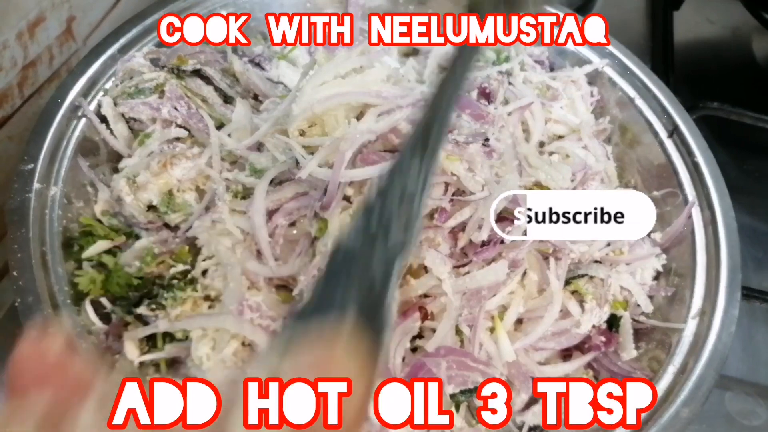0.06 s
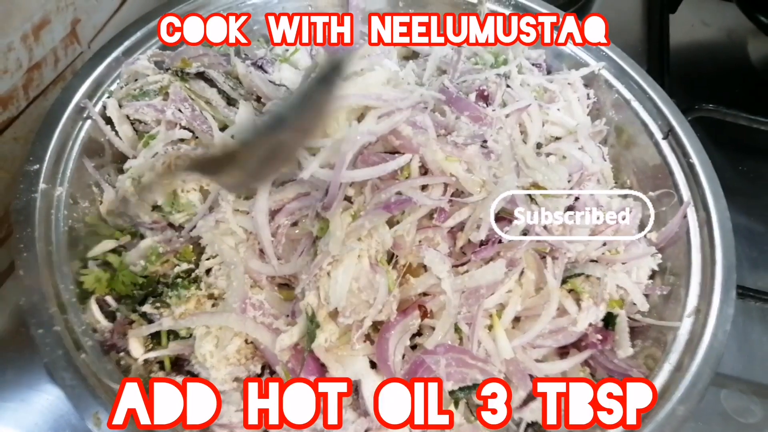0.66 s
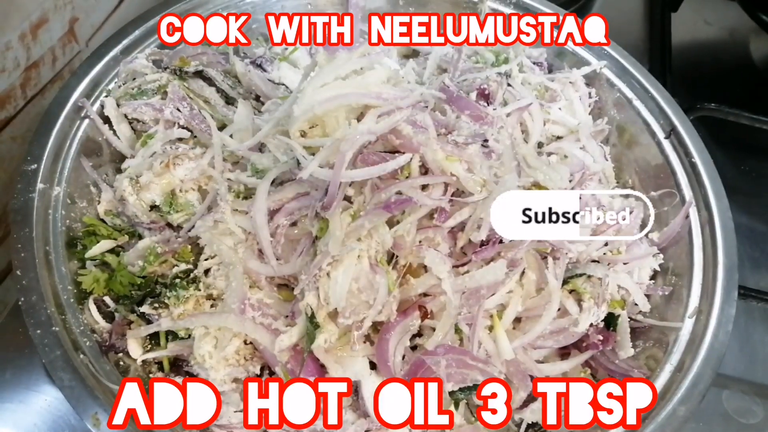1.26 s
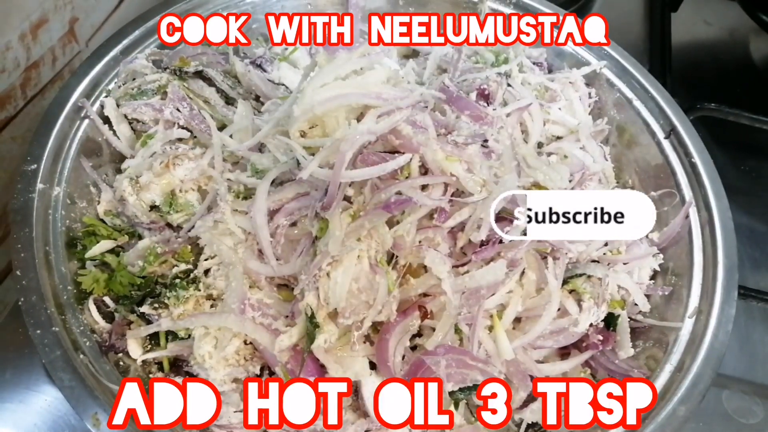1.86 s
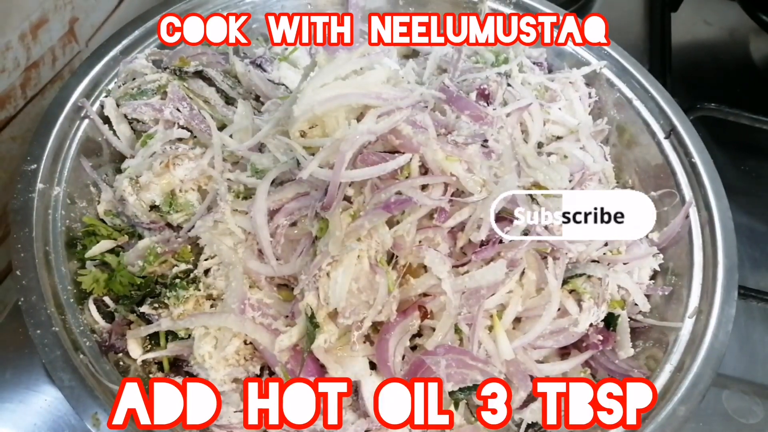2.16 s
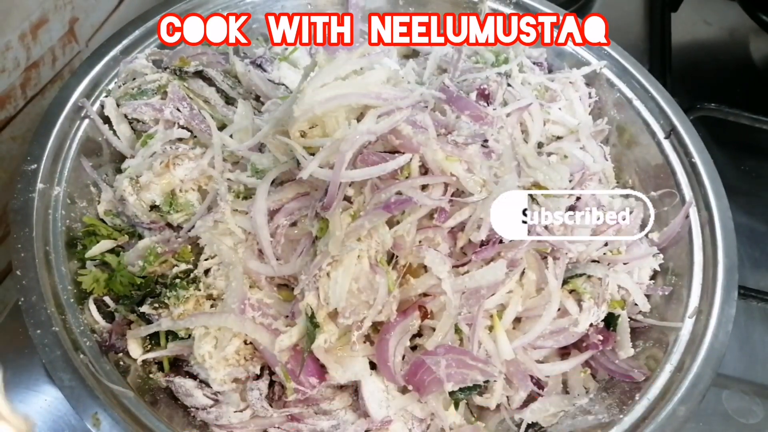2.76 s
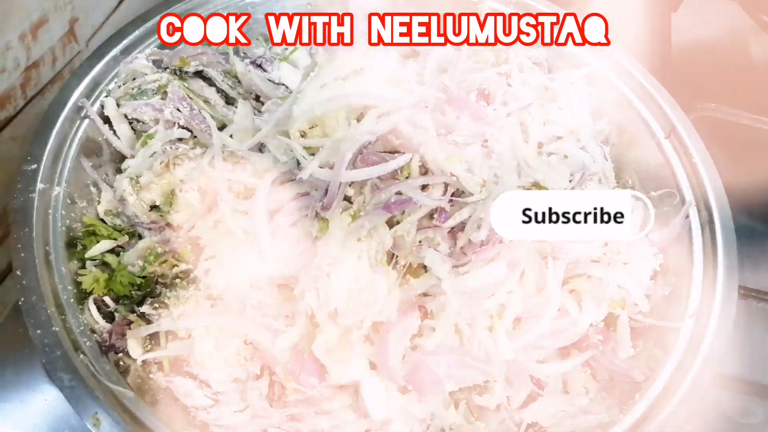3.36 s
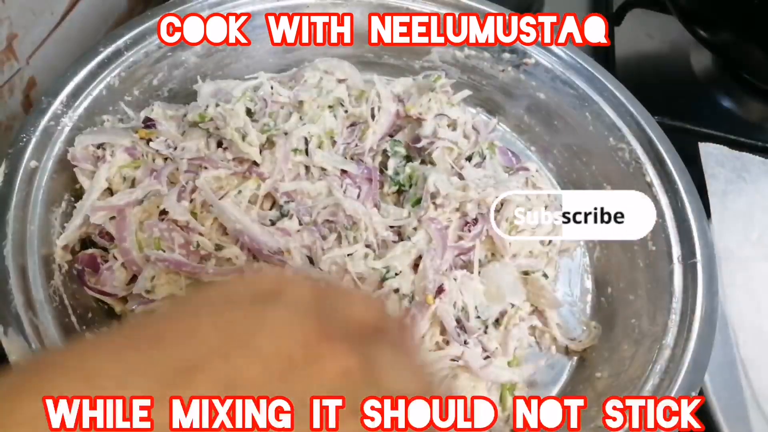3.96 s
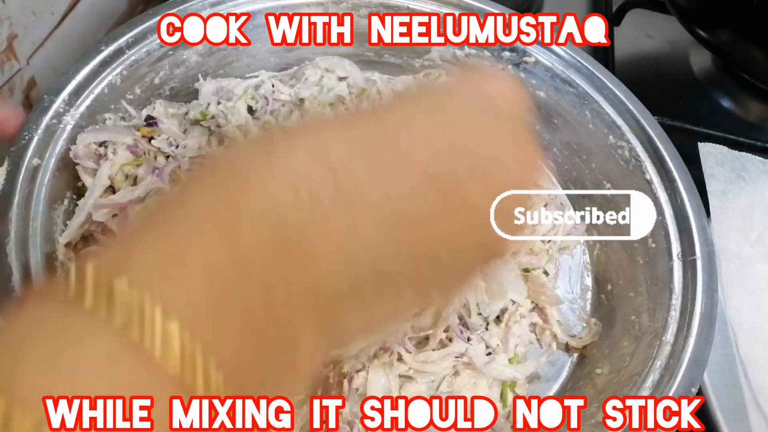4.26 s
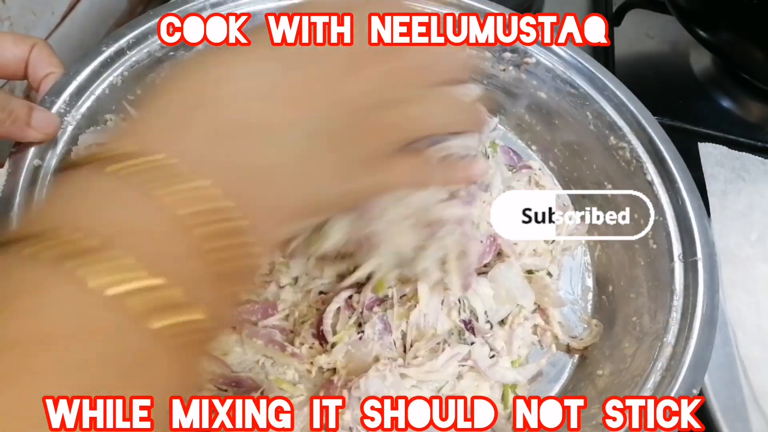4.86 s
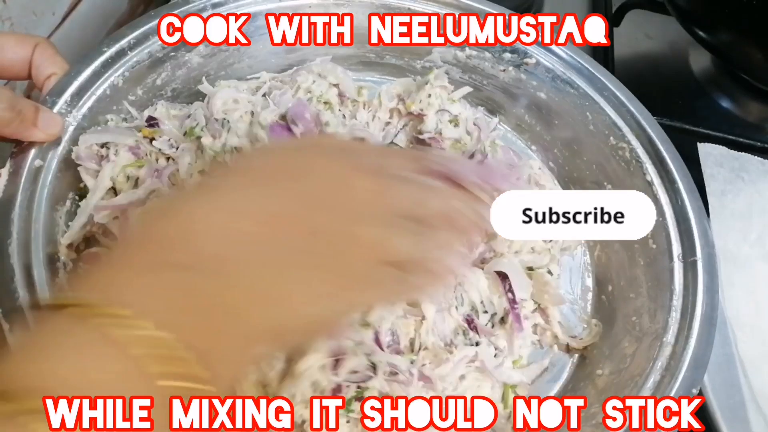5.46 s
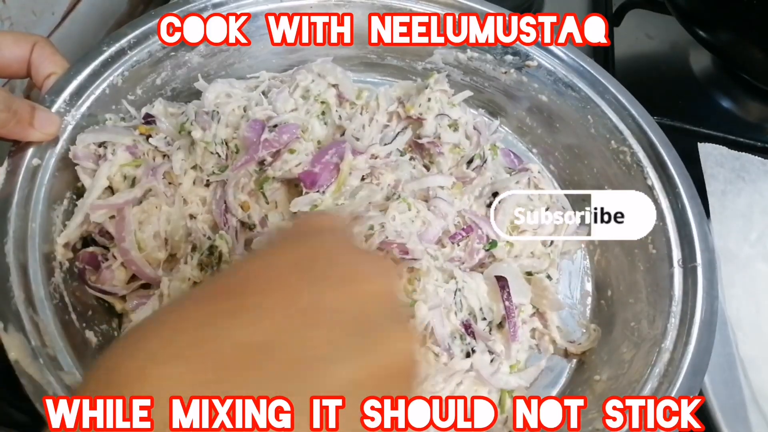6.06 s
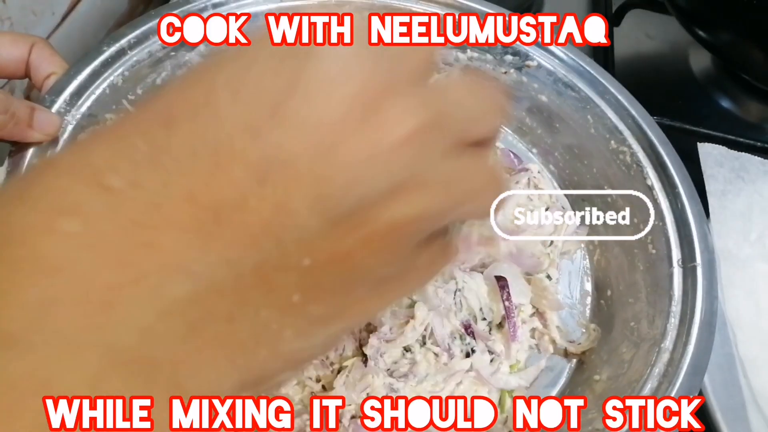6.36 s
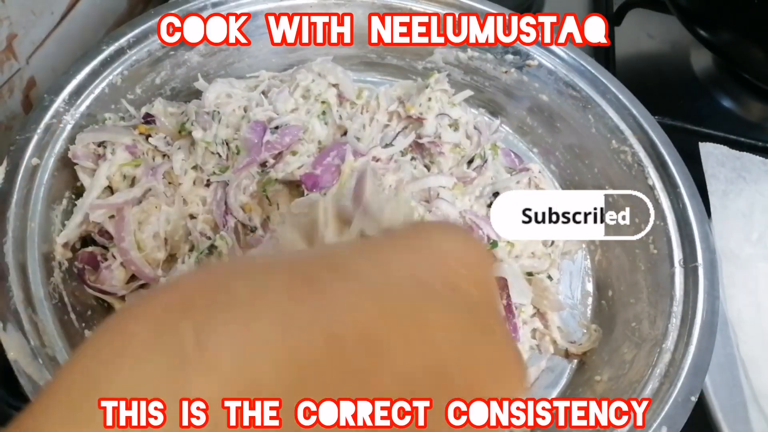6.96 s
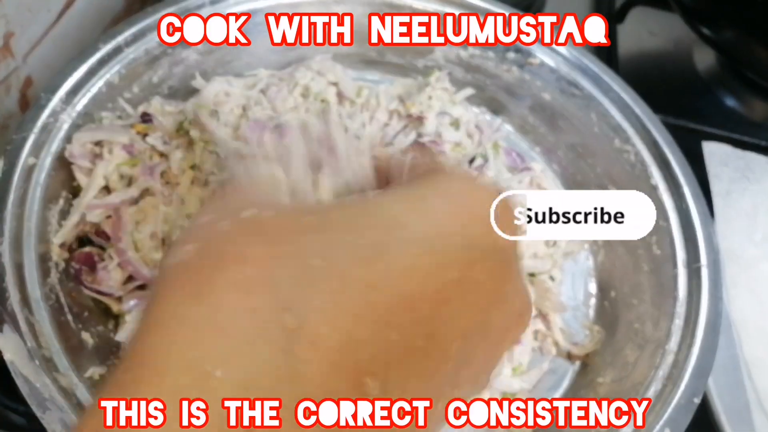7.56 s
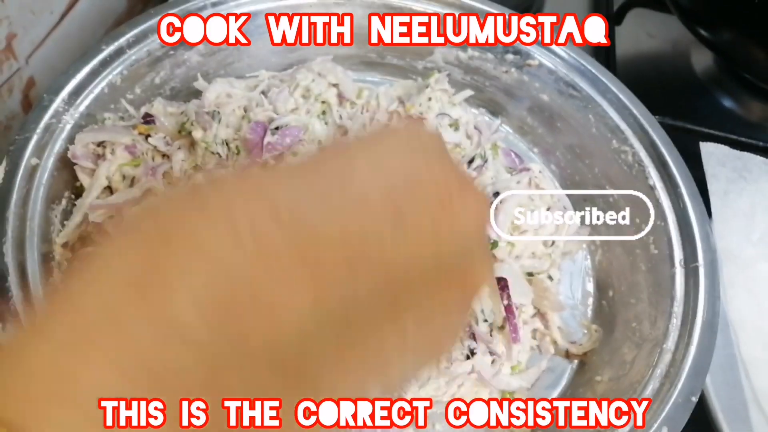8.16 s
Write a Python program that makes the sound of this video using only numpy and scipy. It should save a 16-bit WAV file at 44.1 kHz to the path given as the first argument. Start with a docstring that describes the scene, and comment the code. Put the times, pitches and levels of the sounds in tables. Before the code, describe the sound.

Hot oil sizzles and pops, then fades; a hand tosses damp sliced onions with crisp crackles and a hollow knock on a steel bowl.

```python
"""Hot oil sizzles over a low rumble: bursting bubbles excite the modes of a small metal pan.
The sound fades out and in again; a hand now tosses crisp, damp onion slices with flour, and their
friction and fracture make swarms of tiny clicks. The steel bowl gives one loud, hollow knock among
lighter ones. Nearly everything reaches the right microphone; the left one is faint and dull."""
import sys
import numpy as np
from scipy import signal
from scipy.fft import irfft
from scipy.io import wavfile
from scipy.ndimage import uniform_filter1d

SR = 44100
rng = np.random.default_rng(int(sys.argv[2]) if len(sys.argv) > 2 else 0)


def put_to_file(sound):
    """Save the sound as 16-bit audio at rate SR, in the file named by the first command-line argument."""
    columns = np.atleast_2d(sound).T  # one column per channel
    safe = np.clip(columns, -1, 1)
    whole_steps = np.round(safe * 32767)
    wavfile.write(sys.argv[1], SR, whole_steps.astype(np.int16))


N = 362053
T = np.arange(N) / SR
RING_T = T[:8192]  # time axis of one short event

# Levels in the tables are relative: each layer adds its own gain.
# modes of the pan: pitch_hz, width_hz, level_db
PAN_MODES = [(635, 22, -21), (1100, 24, -13), (1203, 27, -13), (1886, 16, -10), (2164, 17, -9),
             (2530, 70, -28), (2805, 24, -8), (2850, 26, -11), (3456, 60, -28), (3790, 36, -13),
             (3835, 32, -12), (4209, 38, -10), (4791, 28, -4), (4935, 22, 0), (5071, 34, 1), (5135, 30, -7),
             (5480, 26, 1), (5562, 30, -6), (5740, 60, -17), (5953, 35, -10), (6083, 35, -14),
             (6170, 50, -16), (6363, 50, -13), (6890, 60, -19), (7095, 40, -20), (7396, 40, -23)]
# spectrum of its crowd of weak, short modes: frequency_hz, level_db
PAN_WEAK_MODES = [(300, -10), (900, -33.5), (1500, -36), (2500, 0), (4400, 7.5), (5200, 0), (6300, 10),
                  (7600, -24), (15000, -11.5)]
# how hard the oil fries: time_s, fizz_db, coarse_db
FRYING_LEVELS = [(0, -38, -52), (.3, -38.5, -56.5), (.8, -37, -50), (.92, -46, -52.5), (1.2, -38, -51.5),
                 (1.43, -43.5, -59.5), (1.5, -38.5, -53), (1.68, -39, -56.5), (1.9, -41, -53),
                 (2.06, -41, -63), (2.3, -40.5, -51.5), (2.42, -49.5, -54.5), (2.6, -45, -61.5),
                 (2.74, -38, -54.5), (2.95, -41.5, -52), (3.1, -44.5, -54.5), (3.32, -52, -62.5),
                 (3.44, -60, -81)]
# small bubbles burst: start_s, level_db, coarse_share_db
BUBBLE_POPS = [(0.0348, -28, -10), (0.1286, -25.5, -9), (0.159, -26.5, -12), (0.1915, -24.5, -39),
               (0.2748, -29, -15), (0.5247, -31, -2), (0.5846, -21.5, -42), (0.6739, -32, -18),
               (0.7632, -28, -9), (0.7976, -29, -4), (0.8255, -31, -1.5), (0.86, -34, -5),
               (0.9014, -25.5, -17), (0.9617, -27.5, -28), (0.9882, -27.5, -29), (1.1732, -27.5, -5),
               (1.2635, -24, -19), (1.3009, -23.5, -12), (1.4396, -46, -25), (1.5584, -31, -12),
               (1.6272, -22, -5), (1.7744, -22.5, -35), (1.7973, -34, -22), (1.8572, -26, -9),
               (1.9881, -25.5, -14.5), (2.0123, -21.5, -29), (2.2333, -23.5, -33), (2.3211, -27.5, -30),
               (2.4114, -31.5, -26), (2.4518, -30, -12), (2.582, -32, -7), (2.6085, -27.5, -35),
               (2.8574, -28.5, -21), (2.8998, -35.5, -10), (2.9761, -25, -20), (3.1248, -35, -3),
               (3.2081, -41.5, -25), (3.3482, -45.5, -24)]
# the oil boils up: crest_s, bright_db, coarse_db
BUBBLE_SURGES = [(.323, -30.5, -46), (.388, -33.5, -45), (.453, -39, -43), (1.03, -34.5, -51.5),
                 (1.108, -31.5, -38), (1.147, -36.5, -45.5), (1.199, -42, -50), (1.371, -31.5, -50),
                 (1.583, -33.5, -38), (1.637, -29.5, -43.5), (1.833, -34.5, -44.5), (2.098, -41, -52.5),
                 (2.288, -35, -53), (2.507, -45, -45), (2.773, -43.5, -38), (2.818, -32.5, -38.5)]
# large bubbles thud: start_s, level_db
BUBBLE_GLUGS = [(0.125, -50.5), (0.273, -47), (0.432, -45.5), (0.487, -43), (0.986, -41), (1.024, -42),
                (1.097, -41), (1.191, -40.5), (1.264, -40), (1.295, -52), (1.555, -39.5), (1.692, -45.5),
                (1.837, -43), (1.972, -44.5), (2.084, -45.5), (2.146, -43), (2.33, -57), (2.443, -45),
                (2.776, -40.5), (3.132, -56), (3.271, -45)]
# sprays of fine droplets: start_s, level_db, centre_hz
OIL_SPITS = [(0.132, -48.5, 11200), (0.314, -52, 14800), (0.485, -44, 15200), (0.514, -44.5, 11900),
             (0.722, -47, 10900), (0.986, -47, 14600), (1.078, -44, 15000), (1.188, -41, 10740),
             (1.536, -45, 13000), (1.615, -42.5, 15300), (1.734, -44, 15100), (1.877, -50, 15200),
             (2.031, -45, 11500), (2.054, -45.5, 15100), (2.197, -50, 15200), (2.547, -45, 15200),
             (2.588, -45.5, 14000), (2.795, -48, 14400), (3.144, -49, 15200), (3.22, -48.5, 12400)]
# spectrum of droplets on the pan: frequency_hz, level_db
SPRAY_SPECTRUM = [(5000, -17), (7500, 0.5), (8700, 6.5), (9400, -1.5), (10900, 1.5), (11800, -4.5),
                  (12200, 5), (13000, -6), (14100, 0), (14800, 7.5), (15400, -20)]
# strokes of the hand: start_s, length_s, crisp_db, damp_db
HAND_STROKES = [(3.627, 0.12, -67.5, -94), (3.736, 0.18, -61.5, -76), (3.98, 0.37, -60.5, -72.5),
                (4.445, .29, -52.5, -66), (4.768, 0.23, -60, -75), (5.04, .12, -60, -72.5),
                (5.178, 0.12, -61, -79.5), (5.482, 0.18, -62, -75.5), (5.946, 0.12, -53, -71.5),
                (6.131, 0.033, -47.5, -70), (6.385, 0.055, -67, -85), (6.77, 0.17, -68, -83),
                (6.921, 0.02, -59, -75), (7.391, 0.076, -64.5, -81), (7.481, 0.12, -64.5, -92),
                (7.62, 0.2, -73, -99), (8.047, .15, -65.5, -85)]
# spectrum of crisp cracks: frequency_hz, level_db
CRISP_SPECTRUM = [(1500, -38.5), (3200, -11), (4100, -13), (4700, -3.5), (5250, 6), (5800, -0.5),
                  (6500, -12), (7500, -22), (9000, -73), (10500, -25), (13000, -63), (15000, -52)]
# spectrum of damp rubbing: frequency_hz, level_db
DAMP_SPECTRUM = [(200, -50), (600, 0), (1200, -7), (2000, -13), (2700, -4), (3250, 1), (4000, -21),
                 (6000, -3.5)]
# spectrum of wet ticks: frequency_hz, level_db
WET_SPECTRUM = [(5000, -10), (7500, -6), (9000, -14.5), (10500, -11), (14000, -10.5), (15000, -4),
                (15800, -2)]
# slices snap: start_s, level_db, damp_share_db
SLICE_SNAPS = [(3.7088, -40, -19), (3.8154, -43, -14), (3.9106, -39.5, -8), (4.1109, -32.5, -25),
               (4.1735, -39.5, -10), (4.193, -26, -24), (4.2194, -30, -30), (4.295, -33.5, -19),
               (4.614, -34, -22), (4.6595, -32.5, -40), (4.7, -36.5, -14), (4.729, -30.5, -20),
               (5.2873, -46, -19), (5.468, -44.5, -17), (5.561, -38.5, -15), (5.5854, -40.5, -17),
               (5.664, -60, 2), (5.729, -48, -6), (5.9207, -41, -14), (5.964, -40, -27), (6.0008, -34, -31),
               (6.1277, -28.5, -35), (6.2733, -45, -20), (6.788, -46, -27), (6.809, -43, -30),
               (6.846, -38.5, -33), (6.9508, -30.5, -28), (6.9742, -37, -21), (7.4226, -45, -20),
               (7.5567, -51, -24), (7.706, -50, -20), (8.0377, -42.5, -16), (8.0815, -39.5, -16)]
# wet slices peel apart: start_s, level_db, centre_hz
PEEL_TICKS = [(3.906, -59, 14500), (4.0696, -54, 14600), (4.1615, -49.5, 8000), (4.6129, -53, 7650),
              (4.7565, -44, 15000), (4.864, -47.5, 14900), (5.5413, -54, 8400), (6.0233, -53, 7900),
              (6.3959, -57, 12800), (6.4274, -56, 10800)]
# clumps are squeezed and dropped: start_s, level_db, centre_hz
CLUMP_SQUELCHES = [(3.865, -62, 300), (4.044, -58.5, 270), (4.307, -53, 286), (4.341, -56, 417),
                   (4.375, -60, 259), (4.486, -52.5, 2440), (4.497, -58, 231), (4.579, -54, 2470),
                   (5.016, -46.5, 2580), (5.654, -63, 224)]
# modes of the loaded bowl: pitch_hz, width_hz, level_db
BOWL_MODES = [(410, 50, -7), (520, 70, -9), (630, 12, 9), (690, 80, -2), (790, 55, 1), (900, 80, -1),
              (1160, 60, 1), (1280, 90, -3), (1500, 80, -5), (2120, 150, -15)]
# a spoon taps the pan while the oil fries, then the bowl knocks and rocks: start_s, level_db, centre_hz
METAL_KNOCKS = [(.672, -30, 587), (0.728, -39, 637), (.765, -37.5, 560), (3.862, -47.5, 990),
                (3.904, -58, 894), (4.043, -44.5, 970), (4.1924, -21.5, 890), (4.213, -36, 765),
                (4.294, -41.5, 1100), (4.319, -40, 1020), (4.488, -47, 935), (4.575, -47.5, 1140),
                (4.625, -47, 1160)]
# spectrum of the room noise: frequency_hz, level_db
ROOM_SPECTRUM = [(15, -53), (25, -1), (129, -1), (469, -15.5), (537, -17.5), (666, -16.5), (741, -16.5),
                 (1020, -19), (2060, -18.5), (2300, -23), (3440, -22.5), (3930, -30.5), (5280, -15),
                 (7700, -34), (15500, -35)]
# spectrum of the rumble: frequency_hz, level_db
RUMBLE_SPECTRUM = [(25, -8.5), (55, 5), (80, -6), (115, 7.5), (165, 3.5), (220, -1.5), (330, -8.5),
                   (600, -9), (1500, -43.5)]
# spectrum of the noise on the left: frequency_hz, level_db
LEFT_SPECTRUM = [(25, 4), (60, 7.5), (120, 7.5), (200, -5), (330, -10), (900, -11), (1600, -16.5),
                 (3000, -18), (4000, -22.5), (15000, -26)]
# steady tones of a kitchen appliance: pitch_hz, level_db
APPLIANCE_HUM = [(48.4, -84.5), (118.4, -75), (532.9, -85), (726.7, -85.5), (775.2, -89.5), (1997, -105),
                 (2099, -86), (2600, -90.5)]
# transfer from the right side to the left: frequency_hz, gain_db
LEFT_TRANSFER = [(50, -24.5), (120, -26.5), (500, -28), (1200, -39.5), (2500, -57.5), (15000, -57)]

CHANGE_S, DYING_S = 3.44, 0.096  # the frying scene ends; its last sizzle dies over DYING_S
FADE_OUT_S, FADE_IN_S, FADE_FLOOR = 0.54, 0.42, 0.015
FIZZ_DB, COARSE_DB, SIMMER_DB, MIST_DB = 3, 6.5, -2, -14.5
SWELL_S, EBB_DB = 0.033, -3.5  # the frying ebbs while a bubble swells
POP_DB, POP_SLOSH_DB, GLUG_SLOSH_DB = -4, -8.5, -7
STIRRING_DB, PEEL_DB = -76.5, -77.5  # rustle and faint ticks that go on between strokes
SNAP_DB, SNAP_DAMP_DB = -6, -2.5
GRIP_SHARE, RELEASE_S = 0.22, 0.031  # a stroke builds over a share of its length; the slices then settle
EDGE_HZ = 15750


def sizzle():
    """Impact excitation: small, medium and large bubbles ring the pan's high, middle and low modes."""
    shapes, mode_hz = mode_shapes(PAN_MODES), np.transpose(PAN_MODES)[0]
    low = band(shapes[mode_hz < 1500], 500, 1500)
    middle = band(shapes[(mode_hz >= 1500) & (mode_hz < 4500)], 1700, 4600)
    high = band(shapes[mode_hz >= 4500], 4300, 7800)
    spray_ring = ringing(SPRAY_SPECTRUM, decay_s=0.0017)
    out = frying(low, middle, high, spray_ring) + pops(middle, high) + surges(middle, high)
    out += glugs(low, middle) + spits(spray_ring)
    return out * np.clip((CHANGE_S - T) / DYING_S, 0, 1)


def frying(low, middle, high, spray_ring):
    """Shot noise: dense random impulses, each ringing the pan, merge into a continuous sound."""
    fizz_level, coarse_level = frying_levels()
    fizz = sum(through(clumped(400, 4.1, clumps_per_s=22, decay_s=0.028), bright_ring(high))
               for _ in range(5))
    coarse = sum(through(clumped(150, 0.64, clumps_per_s=3.6, decay_s=0.058),
                         strike(middle, scatter_db=5, in_step=True)) for _ in range(4))
    simmer = sum(through(clicks(60, 2), strike(low, scatter_db=2)) for _ in range(3))
    mist = through(clumped(1400, 1, clumps_per_s=30, decay_s=0.024), spray_ring)
    upper = amp(FIZZ_DB) * steadied(fizz) + amp(MIST_DB) * unit(mist)
    lower = amp(COARSE_DB) * steadied(coarse) + amp(SIMMER_DB) * unit(simmer)
    return fizz_level * upper + coarse_level * lower


def frying_levels():
    """Amplitude modulation: the gains of fizz and coarse bubbling drift, and ebb before each pop."""
    swelling = np.zeros(N)  # built in reverse time, so each swell leads up to its pop
    for s, _, _ in BUBBLE_POPS:
        add(swelling, T[-1] - s, np.exp(-(RING_T / SWELL_S) ** 2))
    time_s, fizz_db, coarse_db = np.transpose(FRYING_LEVELS)
    return [amp(np.interp(T, time_s, db) + EBB_DB * swelling[::-1]) for db in (fizz_db, coarse_db)]


def pops(middle, high):
    """Bubble resonance: each small bubble bursts at a pitch of its own and drives the pan."""
    out = np.zeros(N)
    for s, db, coarse_share_db in BUBBLE_POPS:
        rupture = burst(decay_s=0.018, after=1.16)
        bubble = resonance(rupture, hz=5250 * amp(0.98 * rng.standard_normal()), q=3.54)
        add(out, s, amp(db + POP_DB) * peaked(through(bubble, bright_ring(high))))
        add(out, s, amp(db + coarse_share_db + POP_SLOSH_DB) * slosh(middle, after=2))
    return out


def surges(middle, high, half_length_s=0.013):
    """Superposition: swarms of bubbles swell and ebb on the pan under a Gaussian envelope."""
    out, lead_s = np.zeros(N), RING_T[-1] / 3
    envelope = np.exp(-((RING_T - lead_s) / half_length_s) ** 2)

    def swarm(ring):
        return peaked(through(clicks(2500, 4.6, size=len(RING_T)) * envelope, ring), size=500)

    for crest_s, bright_db, coarse_db in BUBBLE_SURGES:
        add(out, crest_s - lead_s, amp(bright_db) * swarm(bright_ring(high)))
        add(out, crest_s - lead_s, amp(coarse_db) * swarm(strike(middle, scatter_db=3, in_step=True)))
    return out


def glugs(low, middle):
    """Low-mode excitation: a large bubble thuds on the pan and also stirs its middle modes."""
    out = np.zeros(N)
    for s, db in BUBBLE_GLUGS:
        thud = strike(low, scatter_db=2.5)
        add(out, s, amp(db - 1.5) * peaked(through(burst(decay_s=0.024, after=1), thud)))
        add(out, s, amp(db + GLUG_SLOSH_DB) * slosh(middle, after=1))
    return out


def spits(spray_ring):
    """Brief impacts carry high frequencies: fine droplets hiss in a narrow treble band."""
    out = np.zeros(N)
    for s, db, hz in OIL_SPITS:
        droplets = through(burst(decay_s=0.021, after=6.7), spray_ring)
        add(out, s, amp(db + 1) * peaked(band(droplets, 0.91 * hz, 1.13 * hz)))
    return out


def bright_ring(high):
    """Impulse response of the pan: its high modes over a crowd of weak, short ones."""
    return unit(strike(high, scatter_db=2.5)) + amp(-18) * ringing(PAN_WEAK_MODES, decay_s=0.01)


def slosh(middle, after):
    """Forced response of the pan's middle modes to one bursting bubble."""
    rupture = burst(decay_s=0.016, after=after)
    return peaked(through(rupture, strike(middle, scatter_db=3, in_step=True)))


def onions():
    """Friction, fracture and adhesion of the tossed slices, heard with a short reverberation."""
    return room(rustle() + snaps() + peeling() + squelches(), t60=0.22, wet_db=-9)


def rustle():
    """Stick-slip friction: slices rub and crack in clumps of clicks, each at a pitch of its own."""
    mixing = fade() * (T > CHANGE_S)
    crisp_level, damp_level = amp(STIRRING_DB) * mixing, np.zeros(N)
    for start_s, length_s, crisp_db, damp_db in HAND_STROKES:
        grip = np.clip((T - start_s) / (GRIP_SHARE * length_s), 0, 1)
        release = np.exp(-np.clip(T - start_s - length_s, 0, 1) / RELEASE_S)
        crisp_level += amp(crisp_db) * grip * release
        damp_level += amp(damp_db) * grip * release
    crisp = sum(resonance(clumped(500, 3.8, clumps_per_s=10, decay_s=0.012), hz, q=3)
                for hz in np.geomspace(3800, 9000, 5))
    damp = sum(resonance(clumped(300, 3.5, clumps_per_s=8, decay_s=0.012), hz, q=3.5)
               for hz in np.geomspace(1500, 3600, 4))
    fine = unit(colour(clumped(1200, 3.5, clumps_per_s=18, decay_s=0.02), WET_SPECTRUM))
    faint_ticks = unit(colour(clumped(220, 3.4, clumps_per_s=24, decay_s=0.02), WET_SPECTRUM))
    out = crisp_level * (amp(-0.5) * steadied(colour(crisp, CRISP_SPECTRUM)) + amp(-12) * fine)
    out += damp_level * amp(8) * steadied(colour(damp, DAMP_SPECTRUM))
    return out + amp(PEEL_DB) * mixing * faint_ticks


def snaps():
    """Brittle fracture: a slice breaks in one short burst with a crisp and a damp part."""
    out = np.zeros(N)
    for s, db, damp_share_db in SLICE_SNAPS:
        crack = burst(decay_s=0.0074, after=0.95)
        add(out, s, amp(db + SNAP_DB) * peaked(colour(crack, CRISP_SPECTRUM)))
        add(out, s, amp(db + damp_share_db + SNAP_DAMP_DB) * peaked(colour(crack, DAMP_SPECTRUM)))
    return out


def peeling():
    """Adhesion gives way: wet slices part with a fine tick."""
    out = np.zeros(N)
    for s, db, hz in PEEL_TICKS:
        peel = colour(burst(decay_s=0.022, after=1.77), WET_SPECTRUM)
        add(out, s, amp(db - 1.5) * peaked(resonance(peel, hz, q=1.9)))
    return out


def squelches(decay_cycles=13):
    """Equal damping per cycle: squeezed clumps resonate, and the low ones last longer."""
    out = np.zeros(N)
    for s, db, hz in CLUMP_SQUELCHES:
        press = resonance(burst(decay_s=decay_cycles / hz, after=0.98), hz, q=2.4)
        add(out, s, amp(db + 0.5) * peaked(resonance(press, hz, q=5)))
    return out


def metal_knocks():
    """Damped modes: a spoon taps the pan during the frying, later the full bowl knocks hollowly, and a softer
    blow excites lower frequencies."""
    shapes, out = mode_shapes(BOWL_MODES), np.zeros(N)
    for s, db, hz in METAL_KNOCKS:
        ring = strike(shapes, scatter_db=1)
        add(out, s, amp(db - 7.5) * peaked(resonance(ring, hz, q=1.37)))
    return room(out, t60=0.27, wet_db=-1.5)


def room(x, t60, wet_db):
    """Reverberation: adds a diffuse kitchen tail whose upper part dies sooner."""
    t = T[:SR // 2]
    hiss = rng.standard_normal(len(t)) * (t > 0.004)
    dull = band(hiss, 150, 580)
    tail = dull * amp(-60 * t / (1.9 * t60)) + (hiss - dull) * amp(-60 * t / t60)
    return x + amp(wet_db) * through(x, tail / np.linalg.norm(tail))


def background():
    """Noise floor (left, right): room noise and hum, with a rumble while the oil fries."""
    hum = sum(amp(db + 6) * np.sin(2 * np.pi * (hz * T + rng.random())) for hz, db in APPLIANCE_HUM)
    rumble = amp(-57.5) * noise(RUMBLE_SPECTRUM) * (T < CHANGE_S)
    right = amp(-65) * noise(ROOM_SPECTRUM) + hum + rumble
    left = amp(-74.5) * noise(LEFT_SPECTRUM)
    return np.array([left, right]) * fade()


def fade():
    """Linear gain ramps, down to the change of scene and up again."""
    return np.clip(np.maximum((CHANGE_S - T) / FADE_OUT_S, (T - CHANGE_S) / FADE_IN_S), FADE_FLOOR, 1)


def clicks(per_s, spread_db, size=N):
    """Poisson impulses of either sign: many small, a few large."""
    draw, out = rng.random(size), np.zeros(size)
    hit = np.flatnonzero(draw < per_s / SR)
    height_db = spread_db * np.minimum(rng.standard_exponential(size)[hit], 4)
    out[hit] = amp(height_db) * np.sign(draw[hit] - 0.5 * per_s / SR)
    return out


def clumped(per_s, spread_db, clumps_per_s, decay_s):
    """Modulated impulses: swarms of clicks start sharply and decay exponentially."""
    onsets = abs(clicks(clumps_per_s, 0.75))
    swarms = signal.lfilter([1], [1, -np.exp(-1 / (decay_s * SR))], onsets)
    return clicks(per_s, spread_db) * (0.38 + swarms)


def burst(decay_s, after):
    """Transient: a unit click and a dying swarm whose energy is `after` squared."""
    swarm = clicks(3000, 4, size=len(RING_T)) * np.exp(-RING_T / decay_s)
    swarm *= after / (np.linalg.norm(swarm) + 1e-12)
    swarm[0] += 1
    return swarm


def mode_shapes(modes):
    """Free vibration: one damped sine per mode, decaying faster the wider its peak."""
    hz, width, db = np.transpose(modes)[:, :, None]
    return amp(db) * width * np.exp(-np.pi * width * RING_T) * np.sin(2 * np.pi * hz * RING_T)


def strike(shapes, scatter_db, in_step=False):
    """Modal sum, weighted by the place of impact; modes in step cancel between their peaks."""
    signs = 1 if in_step else rng.choice([-1, 1], len(shapes))
    return (signs * amp(scatter_db * rng.standard_normal(len(shapes)))) @ shapes


def ringing(spectrum, decay_s):
    """Modal overlap: many random modes blend into a short, decaying noise."""
    return unit(colour(rng.standard_normal(len(RING_T)) * np.exp(-RING_T / decay_s), spectrum))


def noise(spectrum):
    """Stationary noise of rms 1 with the given spectrum."""
    return unit(colour(rng.standard_normal(N), spectrum))


def colour(x, spectrum, size=8192):
    """Minimum-phase filter with the given spectrum."""
    hz, db = np.transpose(spectrum)
    bin_hz = abs(np.fft.fftfreq(size, 1 / SR))
    log_gain = np.log(amp(np.interp(np.log(bin_hz + 1), np.log(hz), db)))
    response = np.exp(np.conj(signal.hilbert(log_gain)))
    return through(x, irfft(response[:size // 2 + 1], size))


def resonance(x, hz, q):
    """Second-order resonator at hz with quality factor q."""
    return signal.lfilter(*signal.iirpeak(min(hz, 0.45 * SR), q, fs=SR), x)


def band(x, low_hz, high_hz):
    """Causal band-pass."""
    sections = signal.butter(2, [low_hz, min(high_hz, 0.45 * SR)], "band", fs=SR, output="sos")
    return signal.sosfilt(sections, x)


def through(x, response):
    """Convolution, cut to the length of x."""
    return signal.oaconvolve(x, response)[:len(x)]


def amp(db):
    """Decibels to gain."""
    return 10 ** (np.asarray(db) / 20)


def unit(x):
    """Normalisation to rms 1."""
    return x / np.sqrt(np.mean(x ** 2) + 1e-30)


def peaked(x, size=88):
    """Normalisation of the loudest `size` samples to rms 1."""
    return x / np.sqrt(uniform_filter1d(x ** 2, size).max() + 1e-30)


def steadied(x, size=2600):
    """Division by the running rms evens out slow swings and keeps the grain."""
    power = uniform_filter1d(uniform_filter1d(x ** 2, size), size)
    return x / np.sqrt(abs(power) + 1e-20)


def add(mix, s, sound):
    """Superposes a sound at time s."""
    part = mix[max(round(s * SR), 0):][:len(sound)]
    part += sound[:len(part)]


def scene():
    """Superposition: all sources sit on the right; a dull trace reaches the left."""
    left, right = background()
    knocks, tossing = metal_knocks(), onions()
    right = right + sizzle() + tossing + knocks
    left_knocks = amp(-22) * room(knocks, t60=0.48, wet_db=-6) * (T > CHANGE_S)
    left = left + colour(right, LEFT_TRANSFER) + left_knocks + amp(-43) * tossing
    return np.array([left, right])


def record(dry):
    """Band limiting: a steep low-pass removes the treble above EDGE_HZ."""
    low_pass = signal.firwin(511, EDGE_HZ, window=("kaiser", 9), fs=SR)
    return signal.oaconvolve(dry, low_pass[None], "same")


dry = scene()
out = record(dry)
put_to_file(out)
```